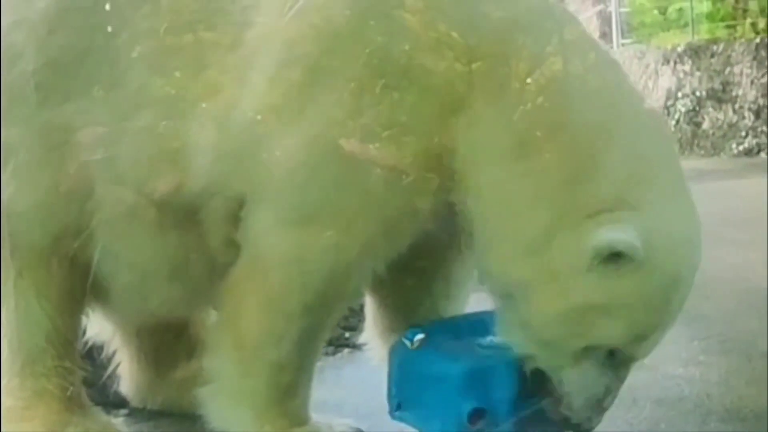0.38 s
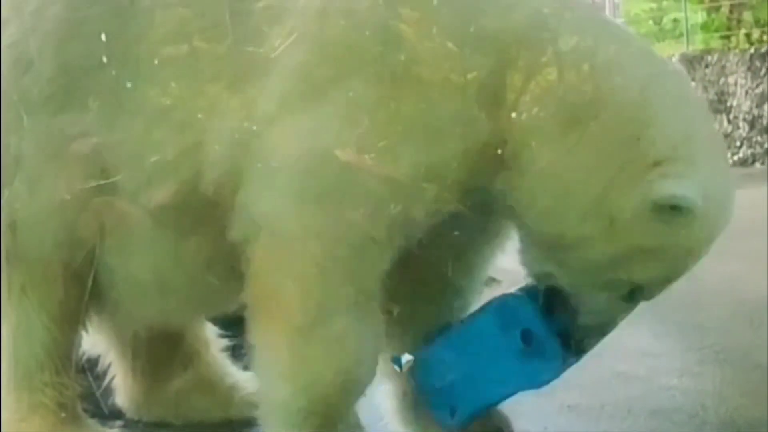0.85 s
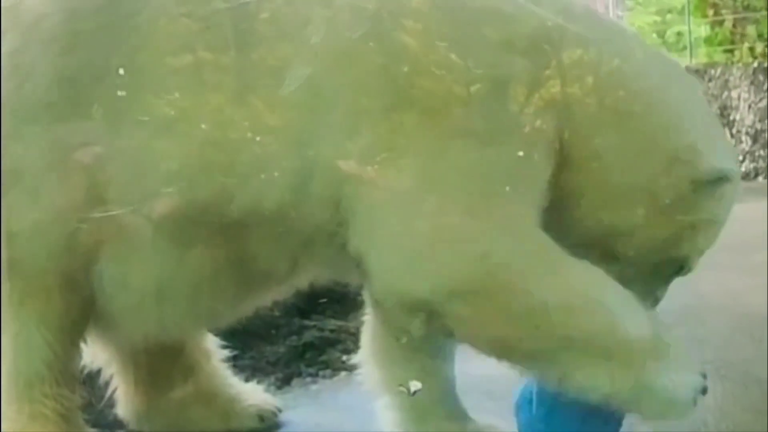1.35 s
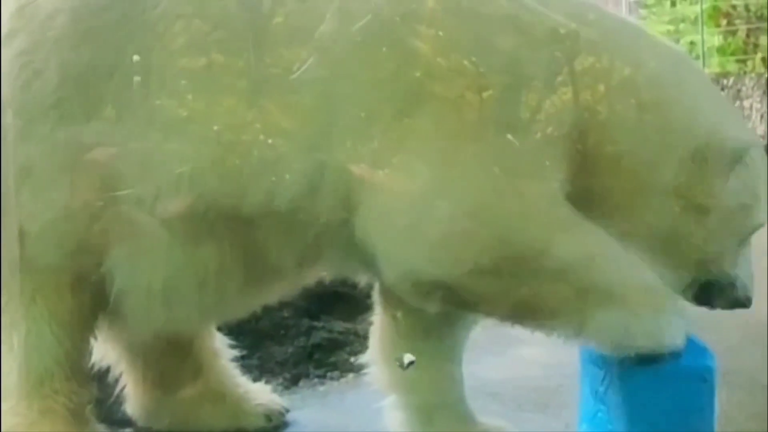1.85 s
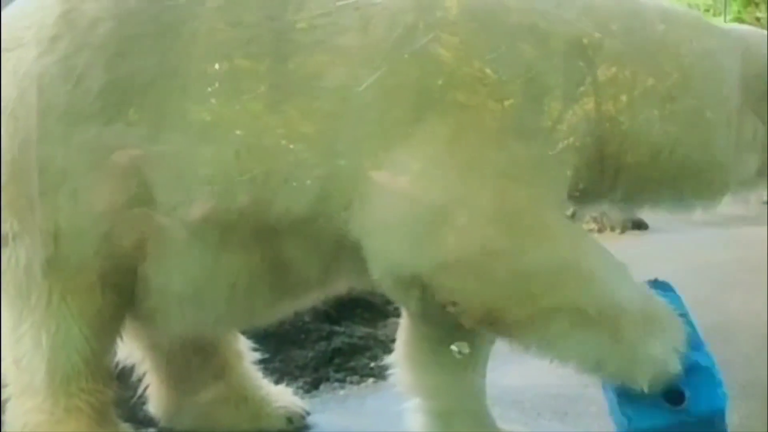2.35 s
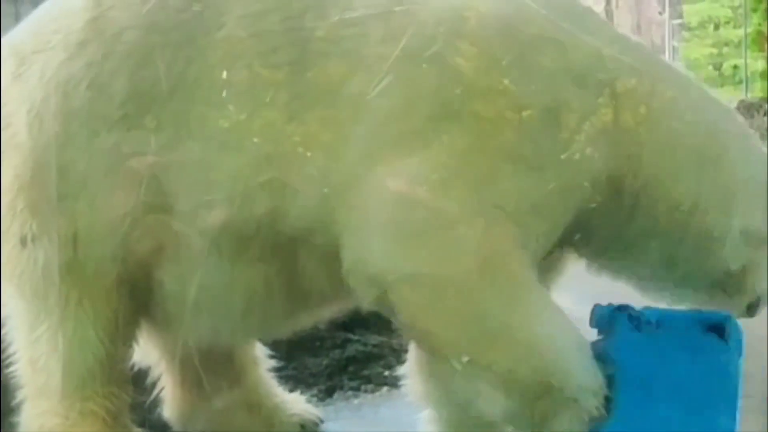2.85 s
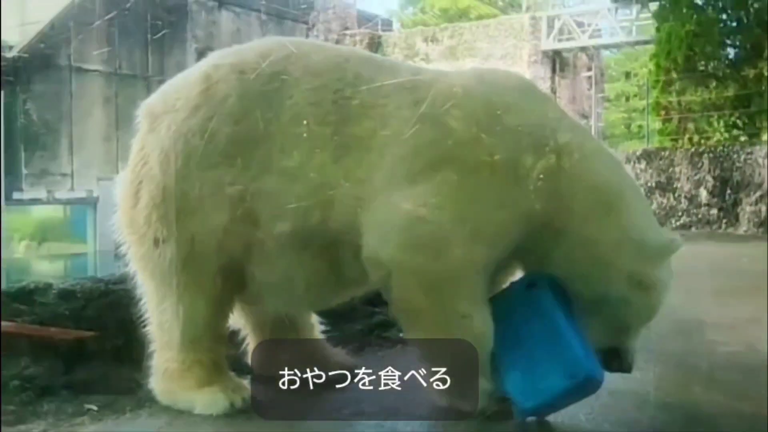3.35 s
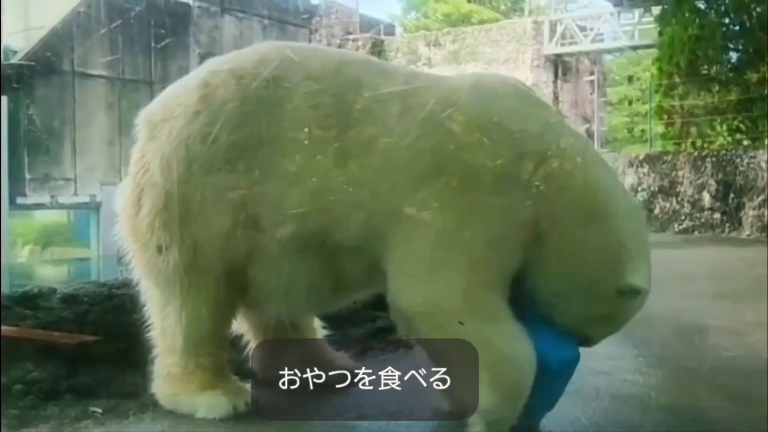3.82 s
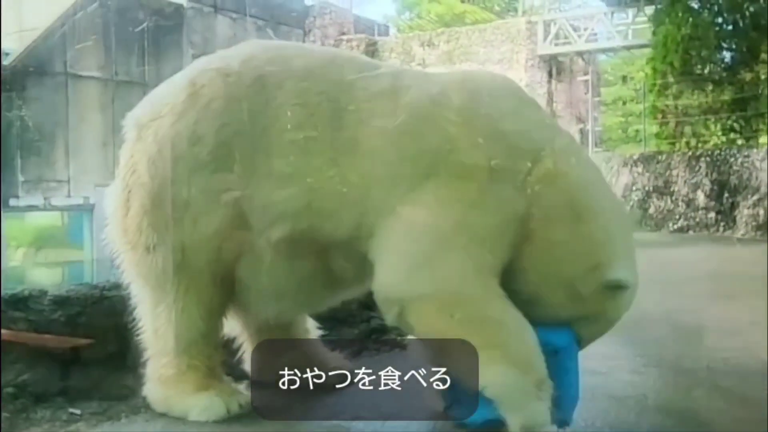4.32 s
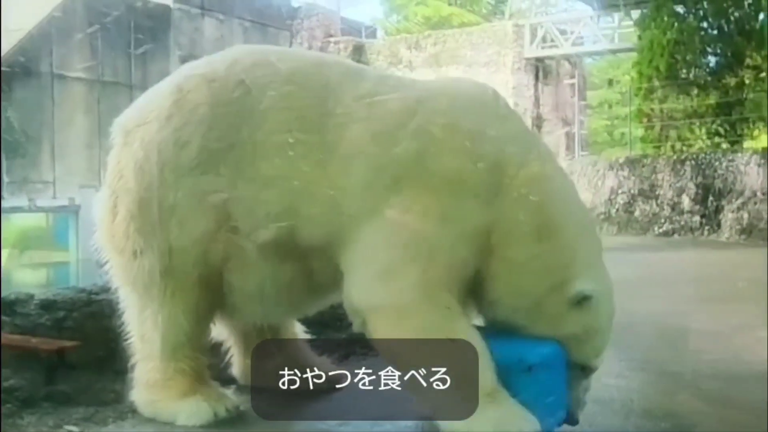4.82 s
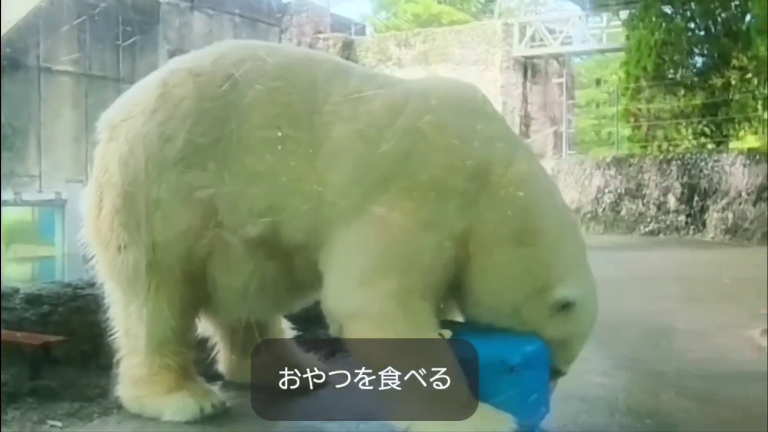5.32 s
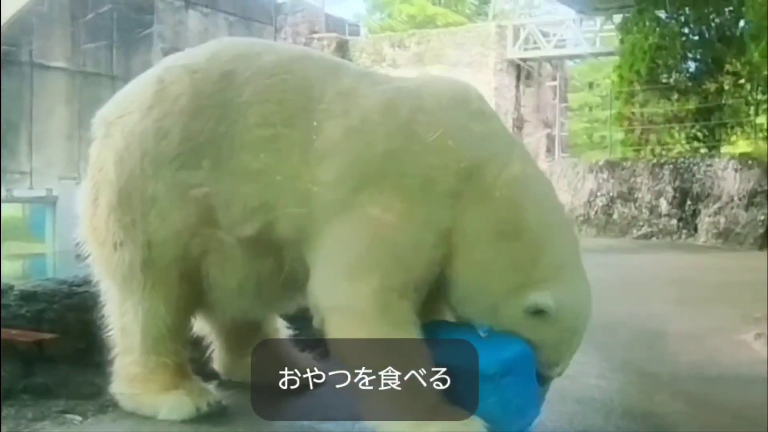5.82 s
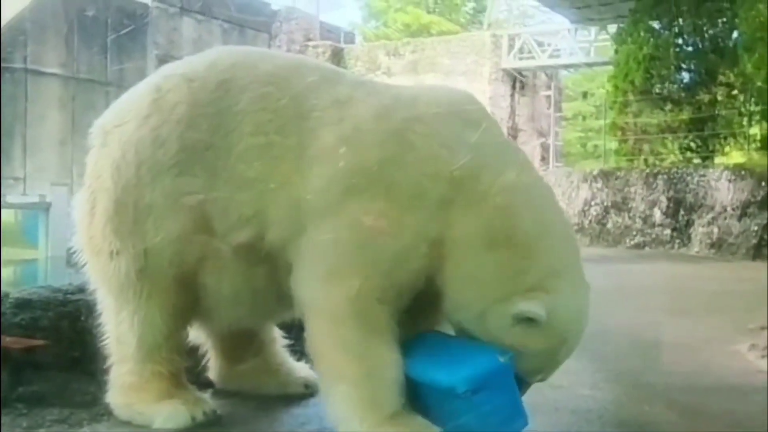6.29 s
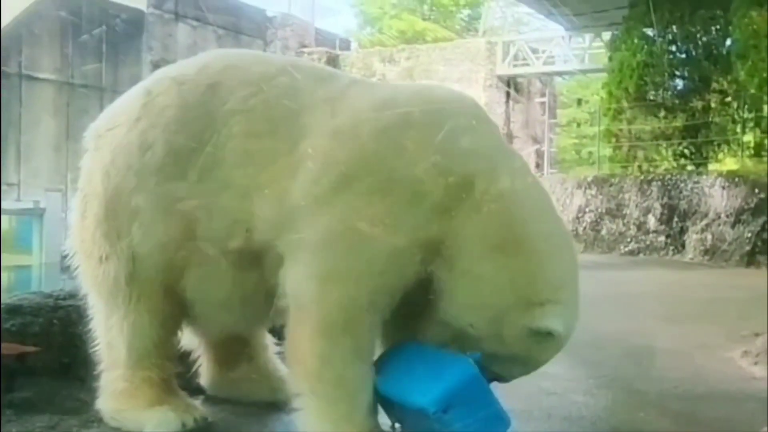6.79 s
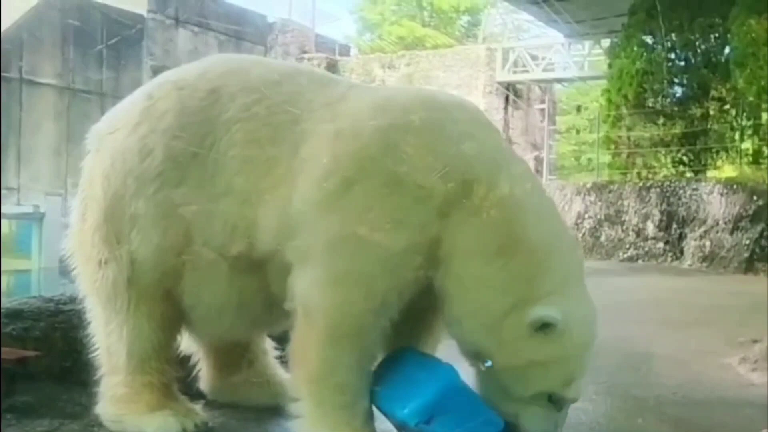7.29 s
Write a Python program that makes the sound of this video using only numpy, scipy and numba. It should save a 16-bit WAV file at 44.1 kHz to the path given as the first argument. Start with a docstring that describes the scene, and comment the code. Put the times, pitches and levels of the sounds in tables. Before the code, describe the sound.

Wide outdoor stereo on a summer afternoon, dominated by steady high cicada buzzing. The closest insect shimmers in very rapid pulses, another pulses more slowly and quietly, and a far chorus hisses all around. Low down, pumps hum unsteadily above a soft town rumble; a faint engine enters early and climbs slowly, while distant vehicles swell dully. Slightly past the middle, a light hollow toy is knocked once, short and dry. The insects continue to the end.

```python
"""A cicada buzzes close by: steady click pairs ring a body whose pitch sweeps quickly upward.
A second throbs slowly between low and high resonances; far singers blur into a grainy hiss in the trees.
Wavering sines make pumps and a climbing engine; shaped noise makes the rumble and passing vehicles.
A plastic toy knocks once, as damped sines. It is a summer afternoon outdoors, in stereo."""
import sys
import numpy as np
from scipy import signal
from scipy.fft import rfft, irfft, next_fast_len
from scipy.io import wavfile
from scipy.ndimage import uniform_filter1d
from numba import njit

SR = 44100
rng = np.random.default_rng(int(sys.argv[2]) if len(sys.argv) > 2 else 0)


def to_wav(s):
    """Save 16-bit WAV."""
    ch = np.atleast_2d(s).T  # columns
    pcm = np.round(np.clip(ch, -1, 1) * 32767)  # PCM
    wavfile.write(sys.argv[1], SR, pcm.astype(np.int16))


def voltage_ratio(decibels):
    """Convert decibels (scalar or array-like) to amplitude ratios, 20 dB per decade."""
    exponent = np.asarray(decibels, float) / 20
    return 10 ** exponent


N = 337806
TIME = np.arange(N) / SR
SIDES = np.array([[1], [-1]])  # left, right


def curve(table):
    """Table columns interpolated to one value per sample."""
    s, *columns = np.transpose(table)
    return [np.interp(TIME, s, column) for column in columns]


def level(x, rms_db):
    """Scale to an rms level."""
    return x * voltage_ratio(rms_db) / np.sqrt(np.mean(x ** 2))


def colour(x, spectrum):
    """Shape by (hz, gain_db) points on a log frequency axis."""
    hz, gain_db = np.transpose(spectrum)
    n = next_fast_len(N)
    log_bins = np.log(np.fft.rfftfreq(n, 1 / SR) + 1)
    gain = voltage_ratio(np.interp(log_bins, np.log(hz), gain_db))
    return irfft(rfft(x, n) * gain, n)[:N]


@njit
def svf(x, hz, width_hz):
    """State-variable band-pass whose centre may move every sample."""
    y, band, low = np.empty(len(x)), 0., 0.
    for i in range(len(x)):
        g, k = np.tan(np.pi * hz[i] / SR), width_hz / hz[i]
        v = (band + g * (x[i] - low)) / (1 + g * (g + k))
        band, low, y[i] = 2 * v - band, low + 2 * g * v, k * v
    return y


def resonance(drive, hz, width_hz):
    """Two equal band-passes in series, scaled to unit rms."""
    once = svf(drive, hz, float(width_hz))
    return level(svf(once, hz, float(width_hz)), 0)


def walk(rate_per_s):
    """Random levels held 1 / rate_per_s and slewed twice; spread near 1."""
    hold = int(SR / rate_per_s)
    steps = np.repeat(rng.standard_normal(N // hold + 1), hold)
    return 1.3 * uniform_filter1d(uniform_filter1d(steps, hold), hold)[:N]


def clicks(turns, offset_turns, jitter_s, scatter_db):
    """One click per turn, placed between samples by a windowed sinc."""
    jitter, scatter = rng.standard_normal((int(turns[-1]), 2)).T
    click_s = np.interp(np.arange(len(jitter)) + offset_turns, turns, TIME) + jitter_s * jitter
    at = SR * click_s[:, None]
    taps = np.floor(at) + np.arange(-7, 9)
    shape = np.sinc(taps - at) * np.cos(np.pi * (taps - at) / 16) ** 2
    weights = shape * voltage_ratio(scatter_db * scatter)[:, None]
    return np.bincount(np.clip(taps, 0, N - 1).astype(int).ravel(), weights.ravel(), N)


def leaves(x, t60_s, scatter_db):
    """Direct sound plus foliage echoes, different for each ear; three tails trade as the leaves stir."""
    stir_per_s, tails = 3.5, 3
    s = np.arange(int(.25 * SR)) / SR
    out = np.array([np.roll(x[0], 30), np.roll(x[1], 40)])  # shifts in samples
    share = np.array([walk(stir_per_s) for _ in range(tails)])
    for weight in share / np.sqrt(np.sum(share ** 2, axis=0)):
        tail = rng.standard_normal((2, len(s))) * voltage_ratio(-60 * s / t60_s)
        tail *= voltage_ratio(scatter_db) / np.sqrt(np.sum(tail ** 2, axis=1, keepdims=True))
        out = out + weight * signal.fftconvolve(x, tail, axes=1)[:, :N]
    return out


# buzzer click pairs: start_s, pairs_per_s; creeps up, slips back, creeps up again
BUZZ_RATE = [(0, 170.9), (4.2, 174.75), (4.3, 170.2), (5.6, 171.65), (7.66, 172.7)]
# buzzer body: sweep_start_hz, sweep_end_hz, stage_width_hz, start_gain_db, end_gain_db, left_minus_right_db
BUZZ_BODY = [(5550, 5960, 540, -2.5, -3.5, -5.5), (6220, 6470, 560, 0.5, -4, 2.5),
             (7020, 7500, 570, -9.5, -5.5, 4), (11060, 15170, 2600, -9.5, 1, 6),
             (14700, 14850, 2500, 0.5, 1.5, 5)]
BUZZ_START_TURNS = .715  # place in the sweep at the outset


def buzzer(gain_db, bright_db, sweeps):
    """Two membranes buckle in turn; the body's pitch climbs through each sweep, holds, drops back fast."""
    turns = np.cumsum(curve(BUZZ_RATE)[0] + .14 * walk(8)) / SR
    drive = clicks(turns, 0, 7e-6, 3) - .8 * clicks(turns, .498, 7e-6, 3)
    climb = np.interp((BUZZ_START_TURNS + sweeps) % 1, [0, .6, .82, 1], [0, 1, 1, 0])
    out = 0
    for start_hz, end_hz, width_hz, start_db, end_db, pan_db in BUZZ_BODY:
        ring = resonance(drive, start_hz + (end_hz - start_hz) * climb, width_hz)
        ring_db = start_db + (end_db - start_db) * climb + SIDES * pan_db / 2
        out = out + ring * voltage_ratio(ring_db + bright_db * (start_hz > 10000))
    return leaves(out * voltage_ratio(gain_db - 2), .09, 3)


# throbber body: mid_hz, glide_hz, stage_width_hz, gain_db, centre_turns, length_turns, left_minus_right_db
THROB_BODY = [(2405, 60, 91, 0.5, 1, 0.17, -3.5), (2378, -13, 330, 2, 0.89, 0.18, -5),
              (3078, 65, 200, -1, 1, 0.29, 1.5), (3240, 2, 580, 1.5, 0.93, 0.11, 3),
              (4870, 709, 840, 3, 0.53, 0.14, -13.5), (8820, 500, 2700, 2.5, 0.58, 0.18, 5)]
THROB_CLICKS_PER_S, THROB_START_TURNS = 310, .305  # mean rate; place in the throb at the outset


def throbber(gain_db, throbs):
    """Rough clicks ring low resonances and high ones by turns as the abdomen pumps."""
    turns = np.cumsum(THROB_CLICKS_PER_S * (1 + .01 * walk(8))) / SR
    drive = clicks(turns, 0, 0.000199, 1.37)
    throb, out = THROB_START_TURNS + throbs, 0
    for mid_hz, glide_hz, width_hz, ring_db, centre, length, pan_db in THROB_BODY:
        place = ((throb - centre + .5) % 1 - .5) / length
        ring = resonance(drive, mid_hz + glide_hz * np.tanh(place) / 2, width_hz)
        gate = np.exp(-place ** 4 / 2)
        out = out + ring * gate * voltage_ratio(ring_db + SIDES * pan_db / 2 + 1.0 * walk(3.4))
    return leaves(out * voltage_ratio(gain_db), 0.23, 0.45)


# toy knocks: start_s, peak_db, left_minus_right_db
KNOCKS = [(4.148, -28, 5)]
# toy wall modes: pitch_hz, relative_db, t60_s
TOY = [(334, 0, 0.01), (560, 0, 0.0071), (850, 5, 0.0064), (1210, -7, 0.01)]


def knocks():
    """Damped sines: the toy's hollow walls ringing after a soft short blow."""
    s = np.arange(2000) / SR
    ring = sum(voltage_ratio(db - 60 * s / t60_s) * np.sin(2 * np.pi * hz * s) for hz, db, t60_s in TOY)
    ring = ring / np.abs(ring).max()
    out = np.zeros((2, N + len(s)))
    for start_s, peak_db, pan_db in KNOCKS:
        i = int(start_s * SR)
        out[:, i:i + len(s)] += ring * voltage_ratio(peak_db + SIDES * pan_db / 2)
    return out[:, :N]


# far chorus spectrum: pitch_hz, relative_db_per_hz
CHORUS = [(1300, -56), (1900, -27), (2150, -11), (2360, -6), (2700, -5.5), (3220, -4.5), (3770, -8.5),
          (4400, -3.5), (5300, -2), (6200, 2.5), (6880, -6.5), (7630, -3.5), (10100, -17.5), (12000, -6),
          (14300, -5.5), (15700, -5)]
# far chorus stereo lean: pitch_hz, left_minus_right_db
LEAN = [(2000, -6.5), (3000, 3), (5500, 1.5), (7000, 5), (10000, 1.5), (15000, -3)]


def chorus(rms_db):
    """Far buzzers at drifting click rates, plus noise, blur into a grainy hiss; each ear hears other trees."""
    ears = []
    for side in (1, -1):
        far = 0
        for clicks_per_s in rng.uniform(300, 370, 9):
            turns = np.cumsum(clicks_per_s * (1 + .003 * walk(.6))) / SR
            far = far + clicks(turns, rng.random(), 5e-6, 1.5) * voltage_ratio(2.0 * walk(1.5))
        far = level(far, 0) + level(rng.standard_normal(N), -1.5)
        lean = [(hz, side * db / 2) for hz, db in LEAN]
        ears.append(colour(colour(far, CHORUS), lean))
    return level(np.array(ears), 0) * voltage_ratio(rms_db)


def tone(hz, rms_db, side_share):
    """A sine common to both ears plus a quadrature part of opposite sign in each."""
    phase = 2 * np.pi * np.cumsum(hz) / SR
    return np.sqrt(2) * voltage_ratio(rms_db) * (np.sin(phase) + side_share * SIDES * np.cos(phase))


# pump hum: pitch_hz, waver_hz, mean_db, side_share
HUM = [(44.55, 1.17, -51.5, 0.14), (149.4, 3.96, -80, 0), (189.4, 9.4, -63, 0), (240.5, 2.51, -67, 0.2),
       (280.4, 5.08, -63.5, 0.73), (311, 4.14, -79, 1), (736, 3.3, -77.5, 0.5)]
PUMP_HZ, PUMP_WAVER_HZ, PUMP_DB = 171.6, 1.62, -47
PUMP_FLUTTER, PUMP_FLUTTER_PER_S = 0.29, 16  # share of the amplitude; rate


def pumps():
    """Hum tones waver in pitch and level; the main pump tone flutters in amplitude."""
    out = 0
    for hz, waver_hz, mean_db, side_share in HUM:
        out = out + tone(hz + waver_hz * walk(12), mean_db + 3.9 * walk(9.7), side_share)
    main = tone(PUMP_HZ + PUMP_WAVER_HZ * walk(14.), PUMP_DB, 0.094)
    return out + main * (1 + PUMP_FLUTTER * walk(PUMP_FLUTTER_PER_S))


# far engine: time_s, mean_db
ENGINE = [(.95, -45.5), (1.5, -41.5), (2.1, -45.5), (2.7, -47), (3.2, -45.5), (4.4, -43), (4.9, -49.5),
          (5.2, -43.5), (7.66, -48.5)]
ENGINE_START_S, ENGINE_HZ, ENGINE_CLIMB_HZ_PER_S = 0.92, 68.84, 4.6
ENGINE_LAG_HZ, ENGINE_CATCH_S = 15.5, .45


def engine():
    """One tone pulls away from below, then catches up with a steady climb."""
    since_s = np.maximum(TIME - ENGINE_START_S, 0)
    lag_hz = ENGINE_LAG_HZ * np.exp(-since_s / ENGINE_CATCH_S)
    hz = ENGINE_HZ + ENGINE_CLIMB_HZ_PER_S * since_s - lag_hz
    fade_in = np.clip(since_s / .08, 0, 1)
    return tone(hz + .5 * walk(2.97), curve(ENGINE)[0] + 1.65 * walk(14), 0.072) * fade_in


# far vehicles: nearest_s, rms_before_fade_db, centre_hz, spread_s
PASSES = [(.7, -66, 990, 0.59), (2.3, -63, 765, 0.3), (4.002, -64, 545, 0.22), (4.544, -59.5, 574, 0.22),
          (5.9, -65.5, 725, 0.34), (7.01, -66, 1420, 0.13), (7.6, -67, 544, .2)]


def traffic():
    """Each far vehicle is a dull band of noise that swells and fades."""
    mid, side = rng.standard_normal((2, N))
    out = 0
    for nearest_s, rms_db, hz, spread_s in PASSES:
        m, s = (level(svf(v, np.full(N, float(hz)), 210.0), rms_db) for v in (mid, side))
        out = out + (m + 0.4 * SIDES * s) * np.exp(-((TIME - nearest_s) / spread_s) ** 2 / 2)
    return out * voltage_ratio(3.0 * walk(3.5))


# town rumble: pitch_hz, relative_db_per_hz
RUMBLE = [(20, -29), (34, -1), (80, 3), (129, -6), (172, -0.5), (194, -3.5), (222, -10.5), (291, -9.5),
          (486, -24.5), (731, -25), (1140, -29.5), (1520, -30.5), (2000, -29.5), (2600, -63), (4400, -120)]
RUMBLE_DB = -43.5


def rumble():
    """Low shaped noise, nearly alike left and right in the bass."""
    mid, side = (colour(rng.standard_normal(N), RUMBLE) for _ in range(2))
    side = colour(side, [(60, -25), (170, -21.5), (350, -8.0), (700, -3.5), (1500, 0.5)])
    return level(mid + SIDES * side, RUMBLE_DB)


# brief dips: lowest_s, depth_db, recovery_s
DIPS = [(1.75, -1.5, .25), (3.2, -0.5, 0.11), (4.62, -2.5, 0.058), (6.0, -3.5, 0.02), (6.28, -4.5, 0.036),
        (7.22, -1, 0.045), (7.45, -3, 0.049)]
DIP_FALL_S, SWELL_DB, SWELL_PER_S = 0.021, 0.65, 5.6


def swell():
    """Shared level in dB: a slight wander plus brief dips, each with its own recovery time."""
    out = SWELL_DB * walk(SWELL_PER_S)
    for lowest_s, depth_db, recovery_s in DIPS:
        slope_s = np.where(TIME < lowest_s, DIP_FALL_S, recovery_s)
        out = out + depth_db * np.exp(-np.abs(TIME - lowest_s) / slope_s)
    return out


# singers' effort: time_s, buzzer_gain_db, buzzer_treble_gain_db, throbber_gain_db, chorus_db
EFFORT = [(0, -42.5, -5, -56.5, -35.5), (.8, -41.5, -6.5, -53, -36), (1.6, -43, -4, -54, -36.5),
          (2.4, -43, -2.5, -55, -36), (3.6, -46, -2.5, -58, -37), (4.8, -45.5, -2.5, -56.5, -36),
          (5.6, -44.5, -3.5, -55.5, -36.5), (7, -47, -3, -55, -35.5), (7.66, -45.5, -4, -55.5, -35.5)]
# both singers quicken: time_s, buzzer_sweeps_per_s, throbs_per_s
TEMPO = [(0, 12.633, 5.35), (3, 13.093, 5.469), (7.66, 13.282, 5.773)]


def scene():
    """Insects follow the swell in full, machines and traffic by half in dB, the knock not at all."""
    buzz_db, bright_db, throb_db, chorus_db = curve(EFFORT)
    sweeps, throbs = np.cumsum(curve(TEMPO), axis=1) / SR
    swell_db = swell()
    insects = buzzer(buzz_db, bright_db, sweeps) + throbber(throb_db, throbs) + chorus(chorus_db)
    background = pumps() + engine() + traffic() + rumble()
    return insects * voltage_ratio(swell_db) + background * voltage_ratio(swell_db / 2 + 0.2 * SIDES) + knocks()


def top_cut(x):
    """Nothing passes above the cut-off."""
    return signal.sosfilt(signal.butter(12, 17080, fs=SR, output="sos"), x)


def record(dry):
    """A steep low-pass cuts everything above 15.77 kHz by 60 dB."""
    mix = np.array([colour(ear, [(20, 0), (15740, 0), (15770, -60)]) for ear in dry])
    return top_cut(mix)


dry = scene()
out = record(dry)
to_wav(out)
```